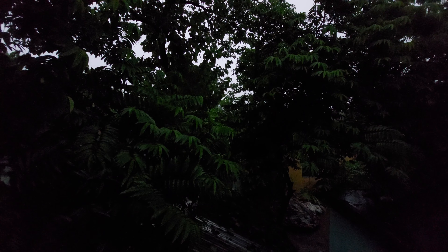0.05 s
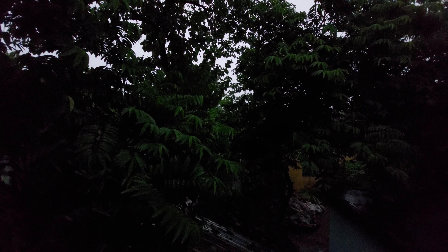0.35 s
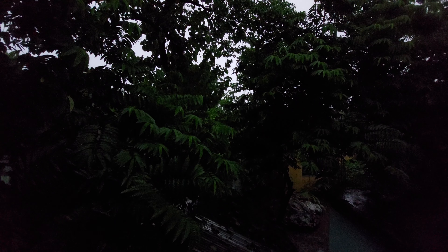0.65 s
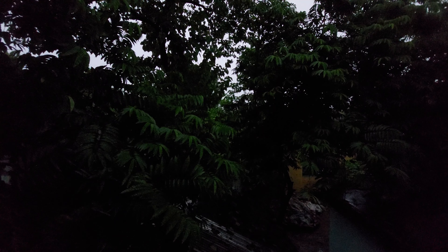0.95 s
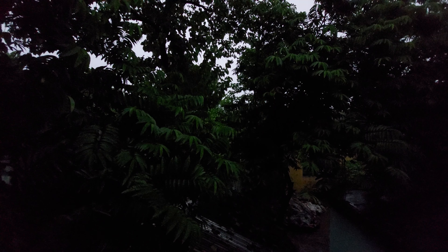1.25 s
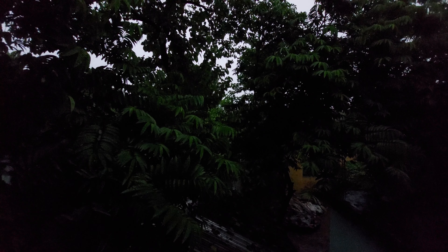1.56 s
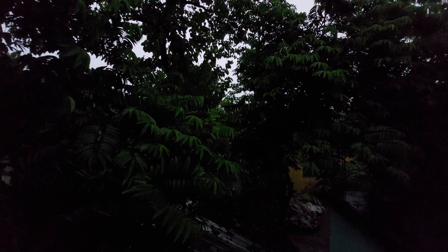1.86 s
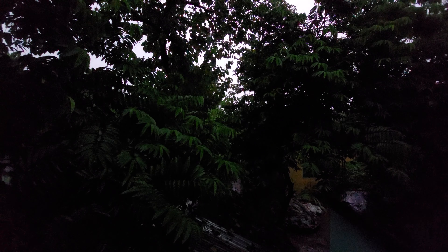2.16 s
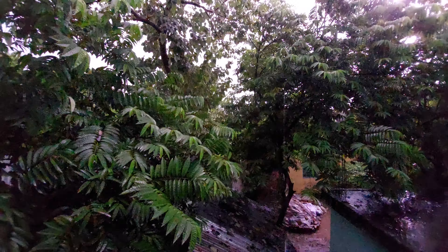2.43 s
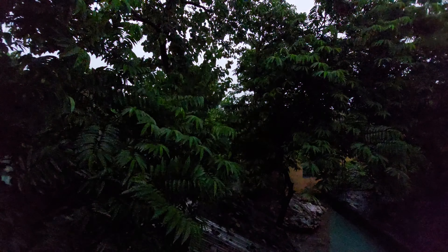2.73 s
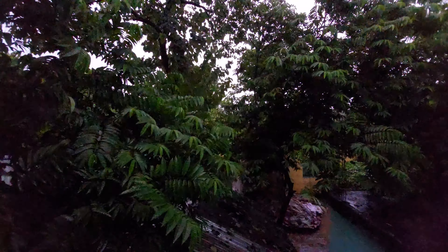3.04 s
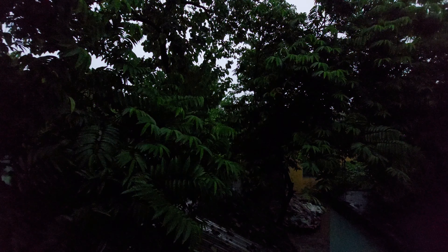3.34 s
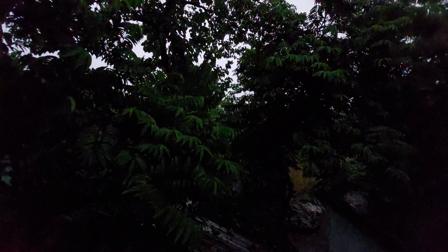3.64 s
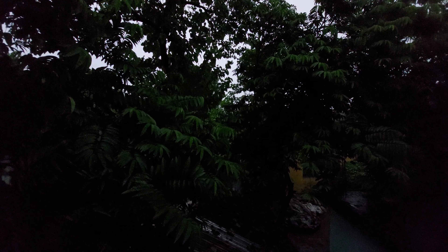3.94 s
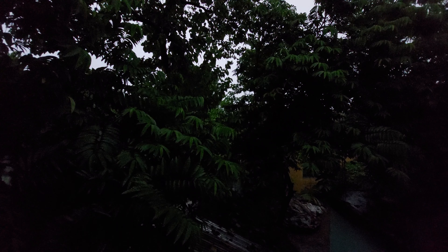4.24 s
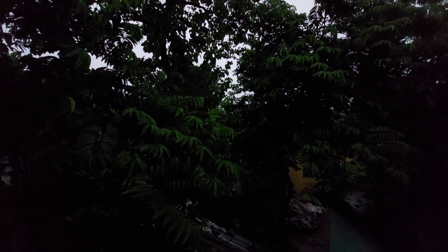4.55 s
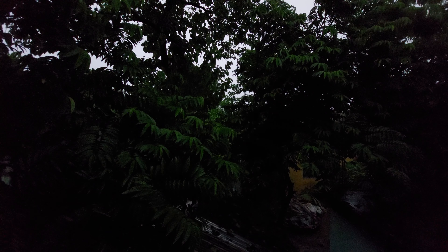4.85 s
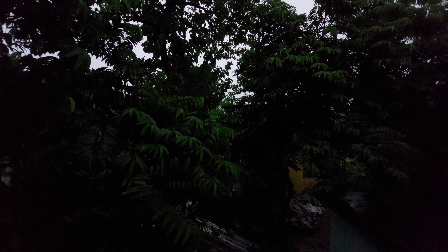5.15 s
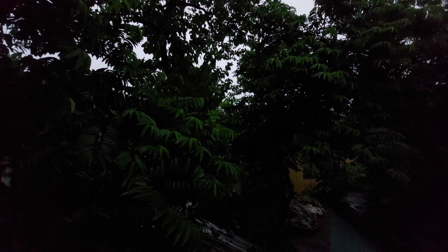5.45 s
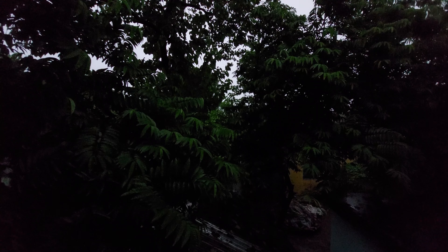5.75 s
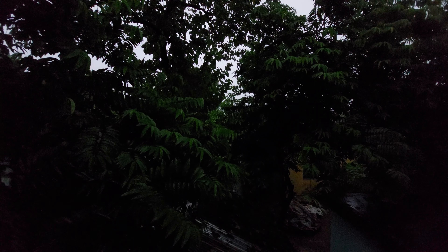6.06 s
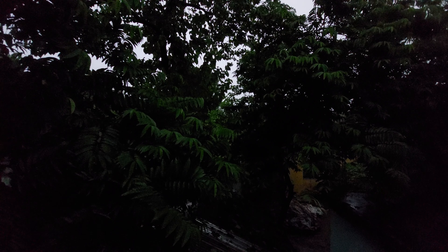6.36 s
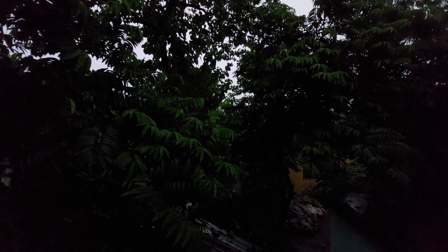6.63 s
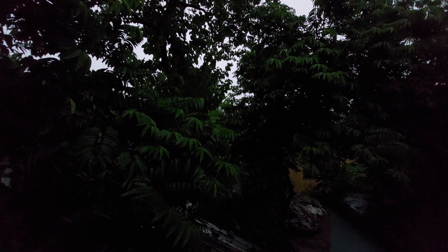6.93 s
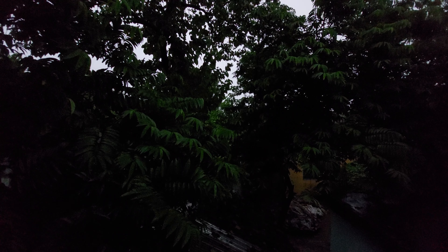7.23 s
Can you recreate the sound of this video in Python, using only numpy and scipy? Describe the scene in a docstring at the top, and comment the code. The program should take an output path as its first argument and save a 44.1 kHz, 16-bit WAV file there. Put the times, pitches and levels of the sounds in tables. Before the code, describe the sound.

Steady rain hisses and patters on garden leaves, with a few close drips, while distant thunder rolls and thuds in two main swells.

```python
"""Steady rain on garden trees: countless drops merge into a wash, nearer ones patter on ringing leaves.
Close by, a few fat drips tick and spray. Distant thunder rolls and thuds, each peal from another
stretch of the bolt. A faint hum lies underneath.
Automatic gain control ducks the rain under the loud peals."""
import sys
import numpy as np
from scipy import signal
from scipy.fft import rfft, irfft
from scipy.io import wavfile
from scipy.ndimage import uniform_filter1d, minimum_filter1d

SR = 44100
rng = np.random.default_rng(int(sys.argv[2]) if len(sys.argv) > 2 else 0)


def generate_wav(signal):
    """Clip the signal to [-1, 1] and save it as 16-bit WAV at the path in sys.argv[1]."""
    frames = np.transpose(np.atleast_2d(signal))
    scaled = np.clip(frames, -1, 1) * 32767
    pcm = np.round(scaled).astype(np.int16)
    wavfile.write(sys.argv[1], SR, pcm)


N = 325899
TIME_S = np.arange(N) / SR
BIN_HZ = np.maximum(np.fft.rfftfreq(N, 1 / SR), 1)
MIC_SPACING_M, SOUND_M_PER_S = .14, 343
PAN_SPLIT = np.array([[.5], [-.5]])  # pan = left minus right level

# rain spectrum: f/Hz, left density/dB, right density/dB
RAIN_SPECTRUM = [(100, 6, 9), (605, 0, -1.5), (800, 0, 1), (1510, -1.5, -2.5), (2330, -2.5, 0.4),
                 (3160, -7, -5), (4190, -7.5, -1.5), (4850, -9, -7.5), (5820, -13, -14.5),
                 (7080, -13.5, -11.5), (7960, -16.5, -22), (10300, -18, -18.5), (11900, -16, -14),
                 (14600, -21.5, -24)]
# shower strength: t/s, level/dB
SHOWER_CURVE = [(0, -37.1), (.7, -36.5), (3.3, -37.5), (4.2, -37.5), (4.9, -37.0), (5.25, -35.6),
                (5.9, -36.5), (7.39, -37.5)]
# thunder peals: crest t/s, level/dB, rise/s, fade/(dB/s), boom/dB, growl/dB
THUNDER_PEALS = [(1.1, -26.5, .5, 15.5, -9, -2), (1.52, -28, 0.27, 90, 5, 2),
                 (2.15, -32, 0.43, 17, -4, 4.5), (2.82, -13, 0.43, 32, -2, -3),
                 (3.16, -19.5, .2, 11.5, -3, -2), (4.15, -26, 0.69, 11, 2, -5.5),
                 (4.62, -27.5, .25, 9, 7, 2.5), (5.34, -21.5, 0.19, 14, -1, 5),
                 (5.95, -24.5, .25, 80, 8, -2), (6.33, -26, 0.45, 19, -10, 0),
                 (6.87, -8.5, .32, 62, 0.5, -4.5), (7.3, -11.5, 0.72, 13, 4, -3)]
# thunder spectrum: f/Hz, density/dB
THUNDER_SPECTRUM = [(20, -46), (32, -29), (52, -7.5), (75, -4.5), (110, 0.5), (150, -1.5), (190, -8),
                    (255, -6.5), (320, -14), (400, -22), (550, -35.5), (900, -53), (2000, -80)]
# distinct shock fronts in the roll: t/s, level/dB, f/Hz, ring t60/s
THUNDER_THUDS = [(2.525, -15, 127, .09), (2.764, -5, 130, 0.13), (2.867, 1.5, 141, .1),
                 (3.128, -3.5, 104.6, .08), (3.336, -4, 111, 0.42), (3.447, -8, 113, .05),
                 (3.504, -6.5, 107.2, 0.41), (3.712, -8.5, 118, 0.11), (3.988, -10, 90, 0.095),
                 (4.174, -14.5, 102, .12), (4.279, -12, 75, .09), (5.293, -6, 103, .05),
                 (5.361, -8.5, 105, 0.22), (5.42, -9, 114, .2), (5.588, -10.5, 111, .14),
                 (6.823, -2, 74, 0.14), (6.892, 1, 134, .1), (7.339, 1, 147, 0.13)]
# fat drips on the nearest leaves: t/s, level/dB, f/Hz, t60/s, pan/dB
LEAF_DRIPS = [(0.164, -26, 4220, 0.013, -11), (.57, -22, 2400, 0.0043, -1), (1.297, -21, 2060, .004, -1),
              (1.298, -22, 5400, .005, 2), (1.472, -22, 4090, .003, 1), (2.221, -20, 2390, .006, -6),
              (2.241, -23, 2290, .005, -3), (3.013, -30, 1250, .018, 4), (3.2355, -22.5, 4020, 0.0063, -13),
              (3.523, -16, 3450, 0.0039, -2), (5.611, -21, 2590, .004, -2), (5.907, -21.5, 4290, .009, -11),
              (5.909, -24, 4880, .007, -9), (5.937, -22, 2800, .016, 0), (6.21, -26.5, 2380, .01, -2.5)]
# drops bursting into spray: t/s, level/dB, t60/s, rise/s
SPRAY_BURSTS = [(1.192, -44, .07, .001), (1.438, -40, 0.28, .001), (1.751, -39.5, .5, 0.014)]
# spray spectrum: f/Hz, density/dB
SPRAY_SPECTRUM = [(4000, -35), (8500, -8), (11000, 0), (12500, 3), (15500, -9)]
# hum tones: f/Hz, level/dB
HUM_TONES = [(102.3, -42), (306.8, -42.5), (343.5, -51)]


def rain(wash_db, patter_db, flutter_db):
    """Far wash and nearer patter rise and fall with the shower."""
    shower_db = np.interp(TIME_S, *np.transpose(SHOWER_CURVE))
    wash = coloured(diffuse_noise(), RAIN_SPECTRUM) * from_db(wash_db + flutter_db * drift(rate_hz=35))
    leaves = patter(drops_per_s=1100, size_db=3, t60_cycles=26, spread_db=10.5, clump_db=3)
    return from_db(shower_db) * (wash + from_db(patter_db) * coloured(leaves, RAIN_SPECTRUM))


def diffuse_noise():
    """White noise from all directions: two spaced microphones agree only on long waves."""
    coherence = np.sinc(2 * BIN_HZ * MIC_SPACING_M / SOUND_M_PER_S)
    mid, side = rfft(rng.standard_normal((2, N)))
    return irfft(np.sqrt(1 + coherence) * mid + np.sqrt(1 - coherence) * side * [[1], [-1]], N)


def patter(drops_per_s, size_db, t60_cycles, spread_db, clump_db):
    """Drops of uneven size and place hit leaves; each leaf rings briefly at its own pitch."""
    leaf_hz = np.geomspace(1700, 13000, 28)
    hits_per_s = drops_per_s * from_db(clump_db * drift(rate_hz=10)) / len(leaf_hz)
    out = np.zeros((2, N))
    for hz in rng.permutation(leaf_hz):
        hits = np.flatnonzero(rng.random(N) < hits_per_s / SR)
        hit_db = size_db * np.minimum(rng.exponential(1, len(hits)), np.e)
        place_db = rng.uniform(-spread_db, spread_db, len(hits)) * PAN_SPLIT
        clicks = np.zeros((2, N))
        clicks[:, hits] = from_db(hit_db + place_db) * rng.choice([-1, 1], place_db.shape)
        leaf = ring(clicks, hz, t60_s=t60_cycles / hz + 0.0036)
        out += np.diff(leaf, prepend=0) / np.sqrt(hz)  # too small to radiate long waves
    return out


def thunder(boom_hz, growl_hz, even_s, lumpy_db, small_thuds_db, pan_db, side_db):
    """Overlapping arrivals merge into a roll; nearer parts of the bolt growl, farther ones boom."""
    level, boom, growl = peal_gains(floor_db=-35.5)
    spectrum = rfft(coloured(rng.standard_normal((2, N)), THUNDER_SPECTRUM))
    low_band = 1 / (1 + (BIN_HZ / boom_hz) ** 8)
    high_band = 1 / (1 + (growl_hz / BIN_HZ) ** 8)
    bands = [(low_band, boom / level), (1 - low_band - high_band, 1), (high_band, growl / level)]
    mid, side = sum(irfft(spectrum * band, N) * gain for band, gain in bands)
    mid = mid / np.sqrt(running_power(mid, even_s))
    mid += from_db(small_thuds_db) * small_thuds(thuds_per_s=14, size_db=2.5, ring_hz=107.8, t60_s=0.094)
    side = from_db(side_db) * rms_one(np.gradient(side))  # channels differ more on short waves
    roll = level * from_db(lumpy_db * drift(rate_hz=20)) * (mid + side * [[1], [-1]])
    return (roll + thuds(ring_db=3.5)) * from_db(pan_db * PAN_SPLIT)


def peal_gains(floor_db):
    """Peals swell 20 dB per rise time, then fade into far rumble; gains of roll, boom and growl."""
    powers = np.full((3, N), from_db(floor_db) ** 2)
    for crest_s, level_db, rise_s, fade_db_per_s, boom_db, growl_db in THUNDER_PEALS:
        age_s = TIME_S - crest_s
        shape_db = np.minimum(20 * age_s / rise_s, -fade_db_per_s * age_s)
        powers += from_db(level_db + shape_db) ** 2 * from_db([[0], [boom_db], [growl_db]]) ** 2
    return np.sqrt(powers)


def thuds(ring_db):
    """Shock fronts, rounded by distance, each with a short low ring from the surroundings."""
    out = 0
    for at_s, level_db, hz, t60_s in THUNDER_THUDS:
        phase = np.clip((TIME_S - at_s) * np.pi * hz, -10, 10)  # wider front, deeper thud
        pulse = (1 - 2 * phase ** 2) * np.exp(-phase ** 2)
        front = from_db(level_db) * rng.choice([-1, 1]) * pulse
        out += 0.58 * front + from_db(ring_db) * ring(front * hz / SR, hz, t60_s)
    return out


def small_thuds(thuds_per_s, size_db, ring_hz, t60_s):
    """Weaker fronts arrive at random and excite one shared low ring; rms 1."""
    arrivals = rng.random(N) < thuds_per_s / SR
    sizes = from_db(size_db * rng.uniform(-1, 1, N)) * rng.choice([-1, 1], N)
    lowpass = signal.butter(2, 2 * ring_hz, fs=SR, output="sos")
    fronts = signal.sosfilt(lowpass, arrivals * sizes + 1e-18)
    return rms_one(ring(fronts, ring_hz, t60_s))


def drips(contact_s, splash_db, splash_t60_s):
    """A fat drop flicks a leaf: a taut one plinks, a limp one splats; fragments land just after."""
    out, age_s = np.zeros((2, N)), TIME_S[:SR // 5]
    for at_s, level_db, hz, t60_s, pan_db in LEAF_DRIPS:
        force = rng.standard_normal((2, len(age_s))) * from_db(splash_db - 60 * age_s / splash_t60_s)
        force[:, 0] += 1  # main impact
        attack = 1 - np.exp(-age_s / contact_s)  # the leaf gives way
        plink = np.sin(2 * np.pi * hz * age_s) * from_db(-60 * age_s / t60_s) * attack
        drip = signal.fftconvolve(force, plink[None], axes=1)[:, :len(age_s)]
        start = int(at_s * SR)
        out[:, start:start + len(age_s)] += drip * from_db(level_db + pan_db * PAN_SPLIT)
    return out


def sprays():
    """A bursting drop throws a fine, quickly thinning hiss of droplets."""
    envelope = 0
    for at_s, level_db, t60_s, rise_s in SPRAY_BURSTS:
        age_s = np.maximum(TIME_S - at_s, 0)
        envelope += from_db(level_db - 60 * age_s / t60_s) * (1 - np.exp(-age_s / rise_s))
    return envelope * coloured(rng.standard_normal((2, N)), SPRAY_SPECTRUM)


def hum(waver_rad, waver_db):
    """Faint, slightly wavering tones, as of a far motor."""
    out = 0
    for hz, level_db in HUM_TONES:
        tone = np.sin(2 * np.pi * hz * TIME_S + waver_rad * drift(rate_hz=1.5))
        out += from_db(level_db + waver_db * drift(rate_hz=2)) * rms_one(tone)
    return out


def gain_control(x, threshold_db, cut_db_per_db, hold_s, release_db_per_s, window_s):
    """Loud peals turn the gain down; it holds, then creeps back."""
    level_db = 10 * np.log10(running_power(x.mean(axis=0), window_s))
    cut_db = cut_db_per_db * np.maximum(level_db - threshold_db, 0)
    half_hold = int(hold_s * SR / 2)
    held_db = -minimum_filter1d(-cut_db, 2 * half_hold + 1, origin=half_hold, mode="nearest")
    release_db = release_db_per_s * TIME_S
    return x * from_db(release_db - np.maximum.accumulate(held_db + release_db))


def ring(clicks, hz, t60_s):
    """Resonator: a unit click starts a decaying sine of height 1."""
    radius = from_db(-60 / (t60_s * SR))
    step_rad = 2 * np.pi * min(hz, SR / 2) / SR
    feedback = [1, -2 * radius * np.cos(step_rad), radius ** 2]
    return signal.lfilter([0, np.sin(step_rad)], feedback, clicks + 1e-18)


def coloured(x, spectrum):
    """Filter by a spectrum table (one level column, or one per side); rms 1."""
    hz, *columns_db = np.transpose(spectrum)
    gain = from_db([np.interp(np.log(BIN_HZ), np.log(hz), db) for db in columns_db])
    return rms_one(irfft(rfft(x) * gain, N))


def drift(rate_hz):
    """Slow random wander; rms 1."""
    return rms_one(irfft(rfft(rng.standard_normal(N)) / (1 + (BIN_HZ / rate_hz) ** 2) ** 2, N))


def running_power(x, window_s):
    """Mean square, smoothed twice."""
    size = max(int(window_s * SR), 1)
    return uniform_filter1d(uniform_filter1d(x ** 2, size), size) + 1e-12


def rms_one(x):
    """Scale to unit power."""
    return x / np.sqrt(np.mean(x ** 2) + 1e-20)


def from_db(db):
    """Decibels to gain."""
    return 10 ** (np.asarray(db) / 20)


def scene():
    """Rain and drips all around, thunder and hum far off."""
    shower = rain(wash_db=2.0, patter_db=-7, flutter_db=0.64)
    near = drips(contact_s=0.00028, splash_db=-27.5, splash_t60_s=0.17) + sprays()
    storm = thunder(boom_hz=89, growl_hz=177, even_s=0.041, lumpy_db=0.9,
                    small_thuds_db=-12.5, pan_db=2.5, side_db=-21.5)
    return shower + near + storm + hum(waver_rad=0.39, waver_db=1.5)


def record(dry):
    """Gain control, 39 Hz high-pass, 4 ms end fades, 15.8 kHz low-pass."""
    ducked = gain_control(dry, threshold_db=-15.5, cut_db_per_db=0.72, hold_s=0.52,
                          release_db_per_s=0.5, window_s=0.093)
    highpass = signal.butter(6, 39, "high", fs=SR, output="sos")
    fades = np.minimum(np.minimum(TIME_S, TIME_S[::-1]) / .004, 1)
    lowpass = signal.ellip(12, .1, 90, 15800, fs=SR, output="sos")
    return signal.sosfilt(lowpass, signal.sosfilt(highpass, ducked) * fades)


dry = scene()
out = record(dry)
generate_wav(out)
```